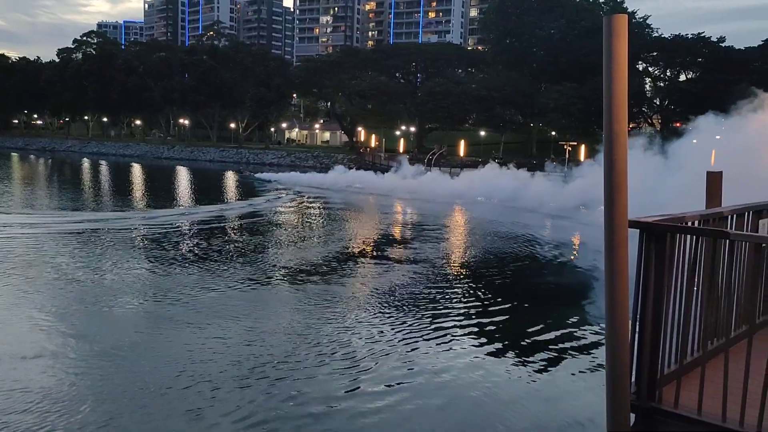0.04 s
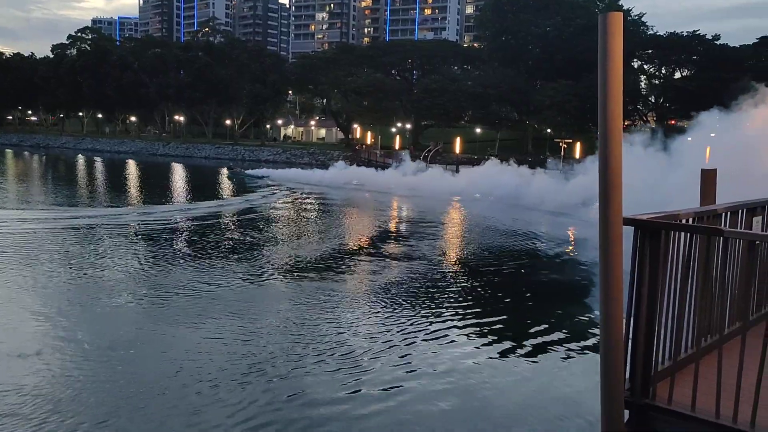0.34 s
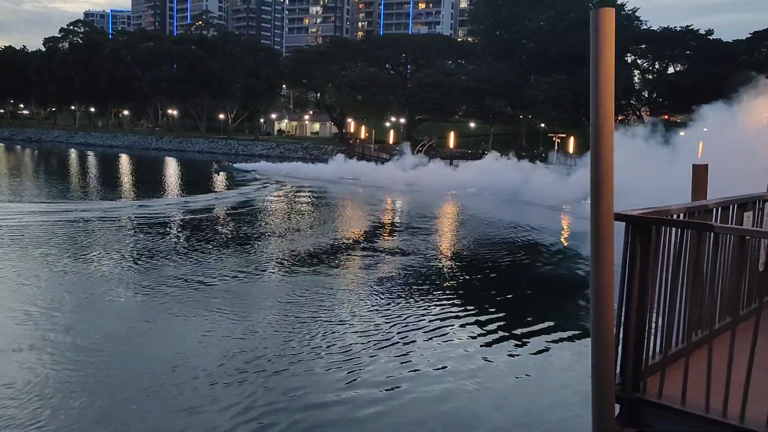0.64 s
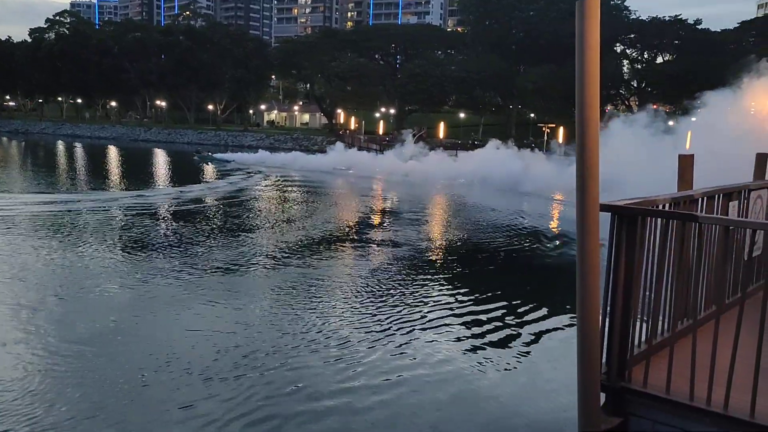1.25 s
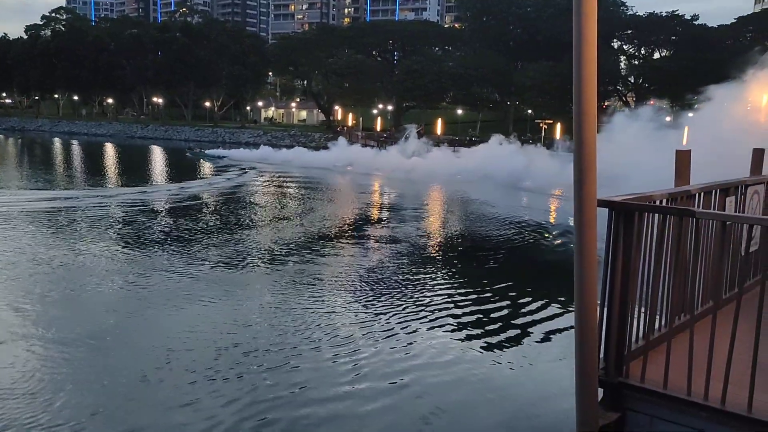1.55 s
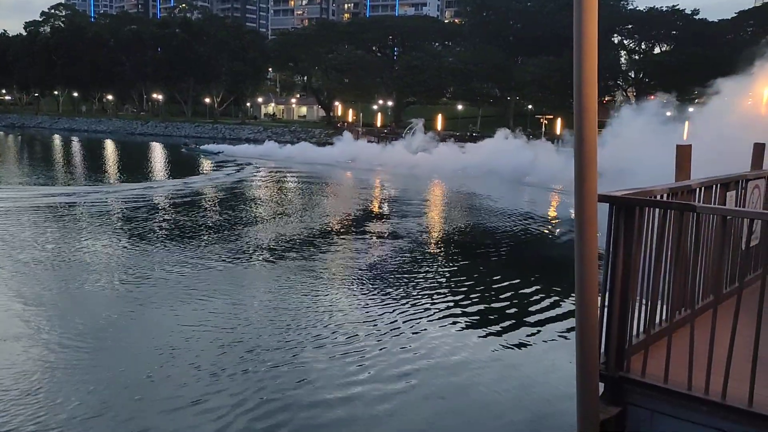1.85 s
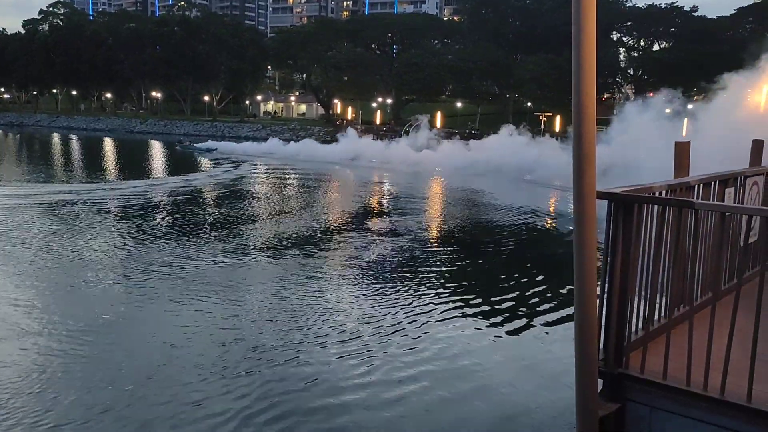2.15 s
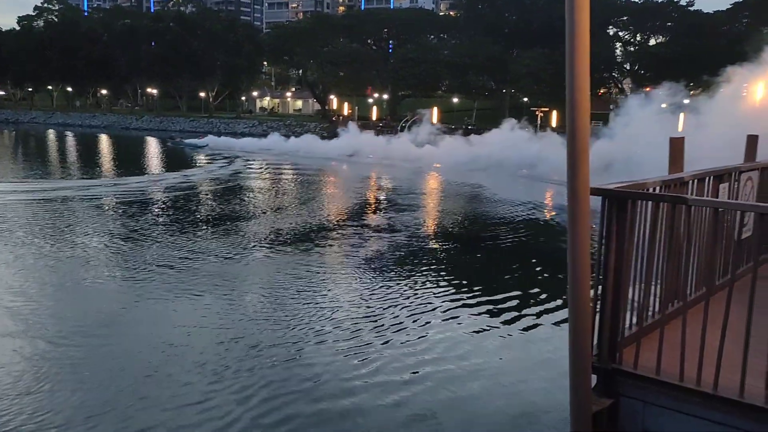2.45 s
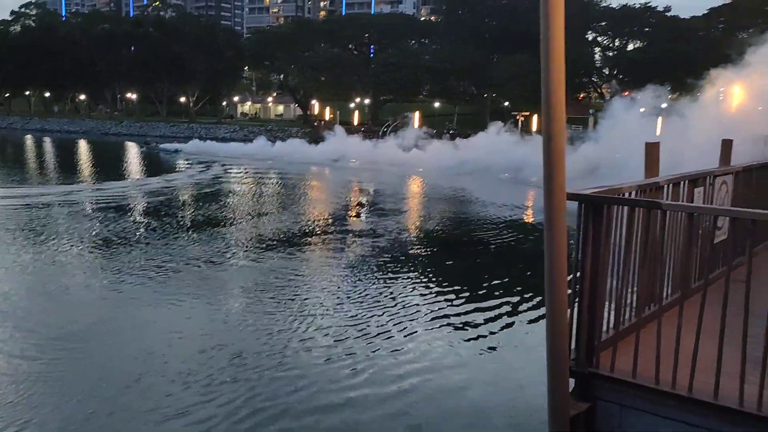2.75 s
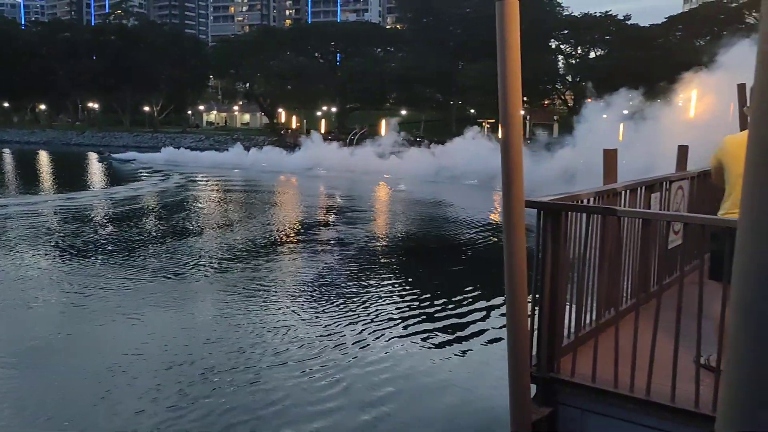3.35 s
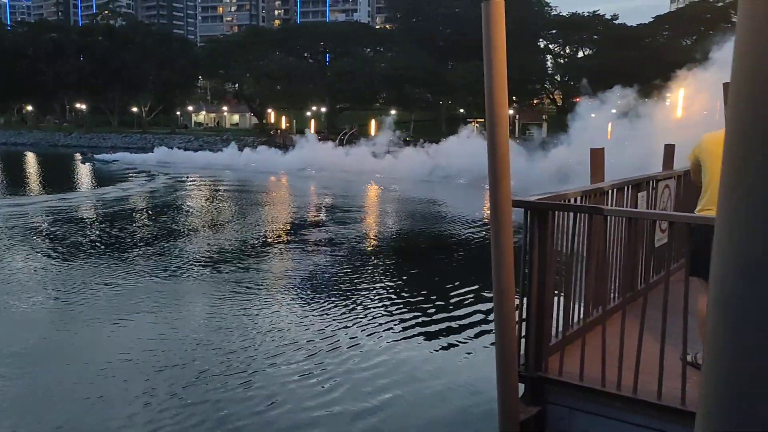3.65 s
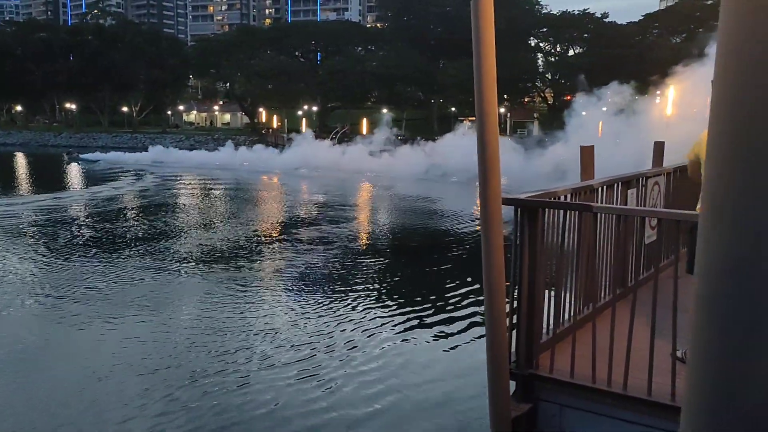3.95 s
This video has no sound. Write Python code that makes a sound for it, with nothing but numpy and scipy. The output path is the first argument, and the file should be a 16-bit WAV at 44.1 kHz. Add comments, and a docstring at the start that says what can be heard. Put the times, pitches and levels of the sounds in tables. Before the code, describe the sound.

A fogging machine drones steadily across open water, with soft rustles and one brief creaky knock.

```python
"""From the start, the pulse-jet of a fogging machine drones from a boat on a reservoir, its firing rate
never quite steady. The banks echo it; its bass swells and fades over a low rumble and a faint hiss.
From about 1 s something close by on the jetty rustles softly now and then, with a few light ticks.
At 2.7 s four quick slips make one short, creaky knock. More rustles follow as the jet drones on."""
import sys
import numpy as np
from scipy.fft import rfft, irfft, next_fast_len
from scipy.io import wavfile
from scipy.ndimage import map_coordinates

SR = 44100
rng = np.random.default_rng(int(sys.argv[2]) if len(sys.argv) > 2 else 0)


def put_to_file(sound):
    """Save the sound as 16-bit audio at rate SR, in the file named by the first command-line argument."""
    columns = np.atleast_2d(sound).T  # one column per channel
    safe = np.clip(columns, -1, 1)
    whole_steps = np.round(safe * 32767)
    wavfile.write(sys.argv[1], SR, whole_steps.astype(np.int16))


N = 176400


def amp(db):
    """Decibels to gain."""
    return 10 ** (np.asarray(db) / 20)

def unit(x):
    """Scale to rms 1."""
    return x / np.sqrt(np.mean(x ** 2) + 1e-20)

def along(points, hz):
    """(Hz, value) points read on a log axis."""
    f, v = np.transpose(points)
    return np.interp(np.log(hz + 1), np.log(f + 1), v)

def curve(rows):
    """(s, value) points as one value per sample."""
    return np.interp(np.arange(N) / SR, *np.transpose(rows))

def wobble(rate_hz):
    """Smooth random curve."""
    return map_coordinates(rng.standard_normal(4000), [np.arange(N) * rate_hz / SR + 2], mode="wrap")

def filtered(x, response):
    """Apply a frequency response."""
    m = next_fast_len(N + SR // 2)
    return irfft(rfft(x, m) * response(np.fft.rfftfreq(m, 1 / SR)), m)[..., :N]

def noise(spectrum):
    """Coloured noise of rms 1."""
    return unit(filtered(rng.standard_normal(N), lambda hz: amp(along(spectrum, hz))))


# Jet firing. Each row: time in seconds, rate in Hz.
FIRING_HZ = [(0.0, 119.4), (0.57, 117.6), (0.61, 120.8), (0.75, 116.8), (0.79, 117.2), (0.83, 121),
             (0.97, 116.7), (1.09, 120.1), (1.27, 116.3), (1.4, 119), (1.45, 116.5), (1.48, 119.2),
             (1.74, 117.3), (1.78, 114.6), (1.83, 117.3), (1.93, 117.6), (1.98, 119.3), (2.13, 116.1),
             (2.19, 119.2), (2.33, 119.3), (2.48, 117.2), (2.54, 120.4), (2.61, 119.9), (2.68, 117.5),
             (3.15, 117.7), (3.34, 120.9), (3.38, 118.3), (3.43, 122.6), (3.49, 118.2), (3.73, 119.2),
             (3.78, 123), (3.82, 120.3), (3.92, 117.9), (4.0, 115.3)]

def fogger():
    """Uneven firings sound the pipe and blow puffs of gas; the overtones echo."""
    rate_hz = curve(FIRING_HZ) + 0.51 * wobble(30) + 1.917 * wobble(118)
    phase = 2 * np.pi * np.cumsum(rate_hz) / SR
    bass, overtones = pipe_tones(phase)
    echo = amp(-10) * overtones.std() * spread(bank_echo(overtones), bank_echo(overtones))
    return bass + overtones + echo + gas_blast(phase)


# Pipe harmonics 1, 2, 4 and the reedy rest. Each row: time in seconds, relative level in dB.
BASS_DB = [(0, -46), (.13, -35.5), (.25, -36), (.33, -39.5), (.48, -32.5), (.57, -41), (.63, -34),
           (.71, -33.5), (.8, -40), (.87, -33.5), (.99, -34), (1.09, -46), (1.17, -37), (1.33, -37.5),
           (1.41, -48), (1.52, -35), (1.68, -34.5), (1.77, -39.5), (1.91, -35), (2.03, -43), (2.13, -32.5),
           (2.21, -33), (2.32, -48), (2.38, -37), (2.49, -34.5), (2.54, -40), (2.62, -34), (2.77, -47),
           (3.01, -33), (3.17, -41), (3.28, -36.5), (3.42, -36), (3.48, -40), (3.62, -35), (3.72, -38.5),
           (3.81, -34.5), (3.9, -37), (4, -47)]
OCTAVE_DB = [(0.0, -40.5), (0.03, -38.5), (0.07, -46.5), (0.14, -37.5), (0.2, -57.5), (0.26, -48),
             (0.6, -47), (0.67, -41), (0.73, -64.5), (0.86, -42.5), (1.01, -47.5), (1.09, -46), (1.15, -61),
             (1.2, -48.5), (1.3, -64.5), (1.34, -45), (1.58, -39), (1.61, -52.5), (1.74, -43),
             (2.07, -45.5), (2.15, -39.5), (2.23, -52), (2.27, -37), (2.35, -50.5), (2.39, -43.5),
             (2.54, -46.5), (2.76, -47), (2.78, -52.5), (2.9, -38.5), (3.03, -53.5), (3.1, -40.5),
             (3.21, -62), (3.26, -38.5), (3.61, -51), (3.98, -39.5), (4.0, -49.5)]
DRONE_DB = [(0.0, -35.5), (0.18, -35.5), (0.21, -45), (0.23, -37.5), (0.72, -36), (0.75, -40),
            (0.82, -35.5), (1.07, -34), (1.08, -39), (1.17, -33), (1.19, -51.5), (1.21, -36), (1.24, -40.5),
            (1.3, -34), (1.54, -40.5), (1.57, -31.5), (1.65, -41), (1.69, -32), (1.76, -37), (2.67, -37),
            (2.71, -42), (2.75, -36.5), (2.8, -40.5), (2.82, -35.5), (3.03, -39), (3.05, -35),
            (3.12, -34.5), (3.14, -36), (3.31, -41), (3.52, -36.5), (3.56, -46.5), (3.59, -38.5),
            (3.98, -40.5), (4.0, -46)]
BUZZ_DB = [(0, -47.5), (.95, -46), (1.3, -47.5), (1.55, -49.5), (1.8, -46.5), (2.2, -47), (2.35, -50),
           (2.65, -49.5), (2.95, -46.5), (3.3, -49), (3.8, -49.5), (3.87, -47), (4, -49.5)]
# Reedy overtones. Each row: harmonic, offset from BUZZ_DB in dB, flutter in dB, phase blur in radians.
BUZZ_HARMONICS = [(3, -7, 2.5, 0.56), (5, -11.5, 7, 0.19), (6, -4.5, -2, 0.11), (7, -14, 2, .25),
                  (8, -7.5, 0.5, 0.26), (10, -16, 3, 0.23), (11, -18, 6, 0.26)]

def pipe_tones(phase):
    """The exhaust pipe sounds fluttering harmonics of the firing rate."""
    def tone(k, blur_rad):
        return unit(np.sin(k * phase + blur_rad * wobble(45) + rng.uniform(0, 2 * np.pi)))
    flutter = lambda rows, trim_db: amp(curve(rows) + trim_db + .9 * wobble(55))
    bass = flutter(BASS_DB, -1.05) * unit(np.sin(phase + .3 * wobble(9)))
    octave = flutter(OCTAVE_DB, -4.42) * tone(2, blur_rad=.35)
    drone = flutter(DRONE_DB, -.62) * tone(4, blur_rad=.18)
    buzz = sum(amp(curve(BUZZ_DB) + db + flutter_db * wobble(18)) * tone(k, blur_rad)
               for k, db, flutter_db, blur_rad in BUZZ_HARMONICS)
    return bass, octave + drone + buzz


# Throat and thin exhaust resonances. Each row: centre in Hz, width in Hz, relative level in dB.
THROAT_MODES = [(224.3, 5.1, 1.5), (344.1, 12.4, 1), (457.8, 27.6, 3), (580.6, 17.4, -3), (682, 22, -6.5),
                (737, 15.8, 1), (808.4, 20, -5.5), (905.5, 19, -2), (940.7, 27, -5), (1240, 58, -9),
                (1302, 52, -10.5), (1500, 38, -10)]
RASP_MODES = [(1657, 33, -3.5), (1932, 25, -2), (2175, 66, -7.5), (2315, 27, -5.5), (2564, 55, -3),
              (2830, 30, -7)]
# Exhaust rasp. Each row: time in seconds, level in dB.
RASP_DB = [(0, -53.5), (.85, -55), (1.1, -53), (2, -57), (2.6, -53), (3.3, -60), (3.6, -58.5), (4, -56)]
# Jet roar. Each row: frequency in Hz, relative density in dB.
ROAR_SPECTRUM = [(200, -19), (400, 4), (1000, 1.5), (1450, -6.5), (2000, -4.5), (2600, -10), (3200, -22.5),
                 (4200, -33), (6000, -56.5)]

def gas_blast(phase):
    """Each firing blows a puff of noise that roars and excites the resonances."""
    puffs = 1 + 0.34 * np.cos(phase)
    def resonate(modes, cutoff_hz, order):
        def response(hz):
            rings = sum((-1) ** k * amp(db) * 1j * hz * width / (centre ** 2 - hz ** 2 + 1j * hz * width)
                        for k, (centre, width, db) in enumerate(modes))
            return rings / (1 + (hz / cutoff_hz) ** order)
        return spread(*filtered(puffs * rng.standard_normal((2, N)), response))
    throat = amp(-40) * resonate(THROAT_MODES, cutoff_hz=1600, order=4)
    rasp = amp(curve(RASP_DB)) * resonate(RASP_MODES, cutoff_hz=3200, order=8)
    roar = amp(-46.5) * unit(puffs * amp(0.54 * wobble(16)) * wide_noise(ROAR_SPECTRUM))
    buzz_db = curve(BUZZ_DB)
    swell = amp(0.46 * (buzz_db - buzz_db.mean()))
    return rasp + swell * (throat + roar)


def bank_echo(x, t60_s=0.57):
    """Diffuse echo from the shore, wrapped so it already sounds at the start."""
    t = np.arange(SR // 2) / SR
    tail = rng.standard_normal(len(t)) * amp(-60 * t / t60_s)
    return unit(irfft(rfft(x) * rfft(tail, N), N))


# Slips of the knock. Each row: start in seconds, level in dB, rise in seconds, share of the
# full ring time, pitch ratio, relative crack level in dB.
SLIPS = [(2.6952, -7.5, 0.00062, 0.62, 1, -23), (2.6973, -3, 0.00083, 0.94, 1, -23.5),
         (2.7021, -10.5, 0.00054, 0.35, 1.165, -17), (2.7099, -10, 0.00045, 0.43, 1.12, -26)]
# Knocked part. Each row: frequency in Hz, relative level in dB, full T60 in seconds.
KNOCK_MODES = [(1974, 0, 0.013), (2340, -13, 0.014), (3770, -40, 0.027)]
# Crack of a slip. Each row: frequency in Hz, relative density in dB.
CRACK_SPECTRUM = [(800, -23), (2000, 8.5), (3400, 4.5), (4600, -5.5), (5700, -3), (7000, -34),
                  (8200, -16.5), (9200, 0), (10500, -13), (12000, -6), (14000, -22), (15500, -33.5)]

def knock(crack_t60_s=0.025, low_cut_hz=1490):
    """Quick slips each ring the same damped modes with a small crack."""
    out, t = np.zeros((2, N + SR)), np.arange(SR // 10) / SR
    grit = np.pad([noise(CRACK_SPECTRUM), noise(CRACK_SPECTRUM)], ((0, 0), (0, SR)))
    for start_s, db, rise_s, share, pitch, crack_db in SLIPS:
        at = slice(round(start_s * SR), round(start_s * SR) + len(t))
        ring = sum(amp(mode_db - 60 * t / (share * t60_s)) * np.sin(2 * np.pi * pitch * hz * t)
                   for hz, mode_db, t60_s in KNOCK_MODES)
        crack = amp(crack_db - 60 * t / (share * crack_t60_s)) * grit[:, at]
        out[:, at] += amp(db) * (1 - np.exp(-t / rise_s)) ** 2 * (ring + crack)
    pan = amp([[-1], [1]])
    return pan * filtered(out[:, :N], lambda hz: 1 - 1 / (1 + (hz / low_cut_hz) ** 12))


# Rustles. Each row: peak time in seconds, half-width in seconds, body in dB, fizz in dB.
RUSTLES = [(1.03, 0.046, -52, -67), (1.25, 0.22, -62, -64), (2.9, .22, -64.5, -64.5),
           (3.106, 0.059, -62, -64), (3.596, 0.071, -51.5, -59), (3.692, 0.036, -55.5, -65),
           (3.815, 0.094, -53, -61.5)]
# Rustle body and fizz. Each row: frequency in Hz, relative density in dB.
BODY_SPECTRUM = [(800, -11), (2400, 13), (4400, -13), (7000, -37.5)]
FIZZ_SPECTRUM = [(2500, -24), (6500, -0.5), (8000, -2.5), (9700, -20), (11300, -14.5), (15000, -26)]

def rustles():
    """Soft swells of brushing noise, mostly on the right."""
    t = np.arange(N) / SR
    body, fizz = (np.array([amp(-5.5) * noise(spectrum), noise(spectrum)])
                  for spectrum in (BODY_SPECTRUM, FIZZ_SPECTRUM))
    swells = sum(np.exp(-((t - peak_s) / half_s) ** 2) * (amp(body_db) * body + amp(fizz_db) * fizz)
                 for peak_s, half_s, body_db, fizz_db in RUSTLES)
    return swells * amp(1.2 * wobble(60))


# Light ticks. Each row: start in seconds, level in dB, centre in Hz, width in octaves.
TICKS = [(1.590, -33, 3500, .3), (1.591, -49, 8500, .35), (2.523, -42, 3300, .6), (2.6562, -38, 6650, .18),
         (2.6707, -23, 2750, .17)]

def ticks(rise_s=0.0016, t60_s=0.008):
    """Tiny dry contacts, each a burst of band noise."""
    out, t = np.zeros((2, N)), np.arange(N) / SR
    for start_s, db, centre_hz, octaves in TICKS:
        bell = lambda hz: np.exp(-.5 * (np.log2((hz + 1) / centre_hz) / octaves) ** 2)
        band = unit(filtered(rng.standard_normal((2, N)), bell))
        age_s = np.maximum(t - start_s, 0)
        out += band * (1 - np.exp(-age_s / rise_s)) * amp(db - 60 * age_s / t60_s)
    return out


# Outdoor rumble and hiss. Each row: frequency in Hz, relative density in dB.
RUMBLE_SPECTRUM = [(10, -8), (25, 1.5), (45, -0.5), (80, -1), (140, -1), (200, -11.5), (300, -13.5),
                   (600, -28.5), (1500, -72)]
HISS_SPECTRUM = [(1500, -18), (3000, 7.5), (4400, -7.5), (5300, 1.5), (6400, 1), (7900, -0.5), (8800, -9.5),
                 (9700, -19), (11300, -15), (13200, -26), (15000, -42)]
# Hiss. Each row: time in seconds, level in dB.
HISS_DB = [(0, -59.5), (.3, -59.5), (.8, -62), (1.3, -62), (1.9, -63), (2.5, -63), (3.4, -62), (3.7, -63.5),
           (4, -62.5)]

def outdoors():
    """Low rumble and a faint wide hiss."""
    rumble = amp(-42.5 + 0.33 * wobble(10)) * wide_noise(RUMBLE_SPECTRUM)
    hiss = amp(curve(HISS_DB) + 0.43 * wobble(5.7)) * wide_noise(HISS_SPECTRUM)
    return rumble + hiss


# Left-right likeness. Each row: frequency in Hz, coherence.
COHERENCE = [(25, 0.76), (80, 0.99), (300, 0.95), (650, 0.83), (1000, 0.77), (1400, 0.24), (2000, 0.094),
             (4000, 0.023)]

def spread(a, b):
    """Two unrelated signals as a stereo pair, alike in the bass, wide in the treble."""
    turn = lambda hz: np.arccos(np.clip(along(COHERENCE, hz), -1, .999)) / 2
    mid, side = filtered(np.array([a, b]), lambda hz: np.array([np.cos(turn(hz)), np.sin(turn(hz))]))
    return unit(np.array([mid + side, mid - side]))

def wide_noise(spectrum):
    """Coloured stereo noise."""
    return spread(noise(spectrum), noise(spectrum))


def scene():
    """The far machine, the open air and the small sounds on the jetty."""
    return fogger() + outdoors() + rustles() + knock() + ticks()


# Microphone colour. Each row: frequency in Hz, left minus right in dB.
MIC_TILT_DB = [(600, 0), (1300, 1), (2000, 1.3), (2600, 2), (3300, 6.5), (4400, 11), (6200, 11.5),
               (7400, 2.5), (8000, -2), (8700, -8), (9700, -5), (11500, 0), (14000, -2.5)]

def record(dry):
    """Two band-limited microphones, differently coloured; the left lags in the lows."""
    lag_s, top_hz = .00006, 15700
    sides = np.array([[.5], [-.5]])
    tilt = lambda hz: amp(sides * along(MIC_TILT_DB, hz))
    delay = lambda hz: np.exp(-2j * np.pi * sides * lag_s * hz / (1 + (hz / 1500) ** 2))
    return filtered(dry, lambda hz: tilt(hz) * delay(hz) * (hz < top_hz))


dry = scene()
out = record(dry)
put_to_file(out)
```